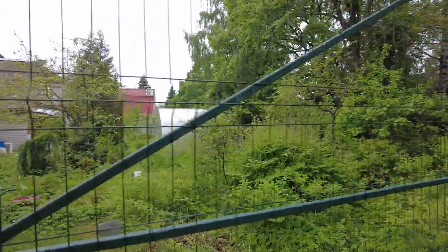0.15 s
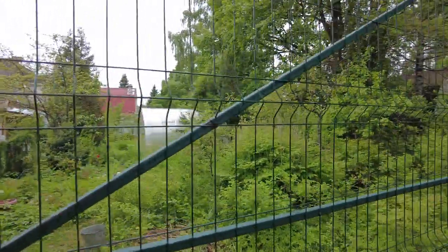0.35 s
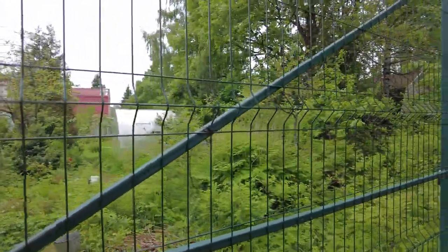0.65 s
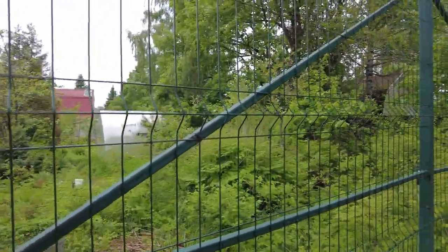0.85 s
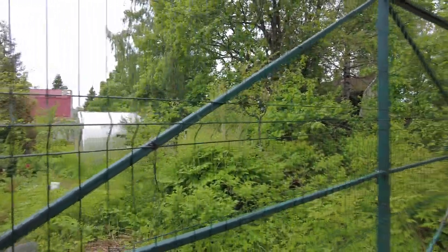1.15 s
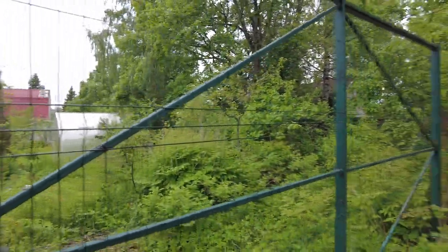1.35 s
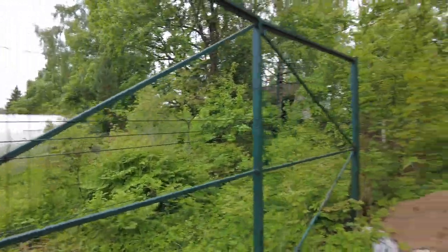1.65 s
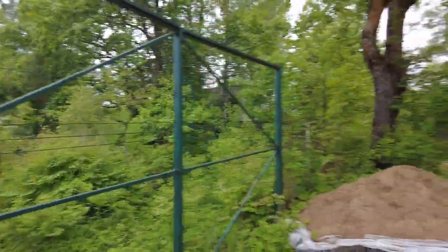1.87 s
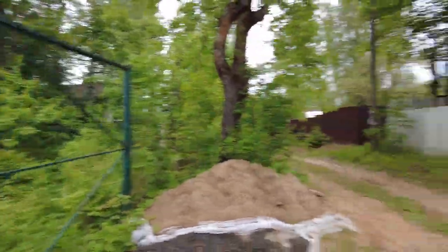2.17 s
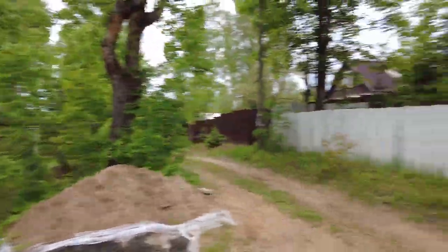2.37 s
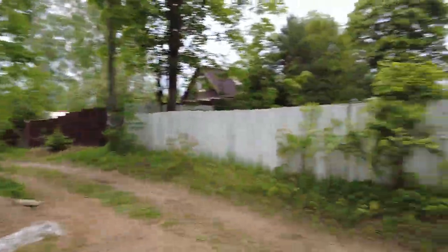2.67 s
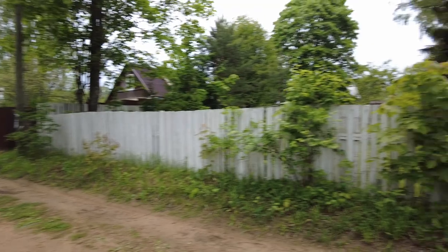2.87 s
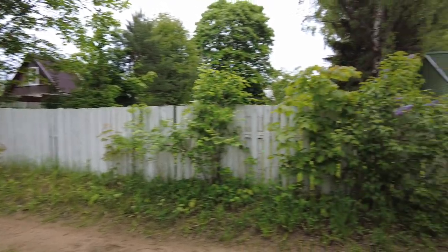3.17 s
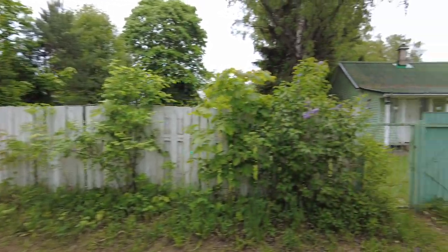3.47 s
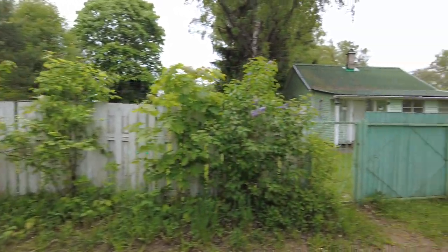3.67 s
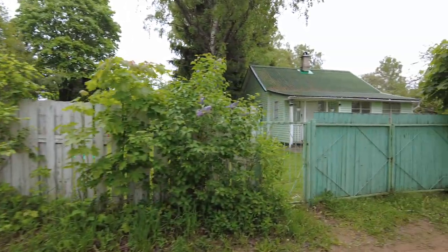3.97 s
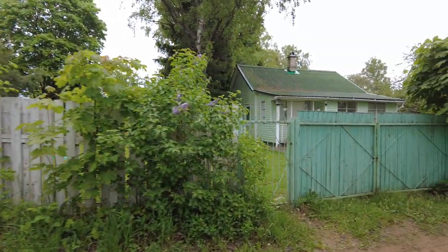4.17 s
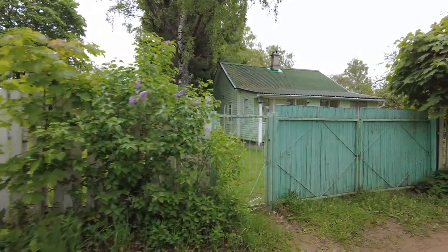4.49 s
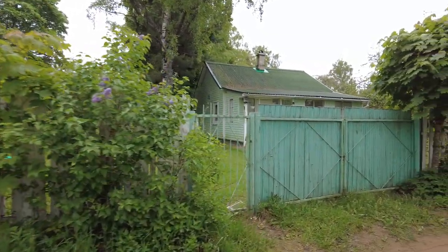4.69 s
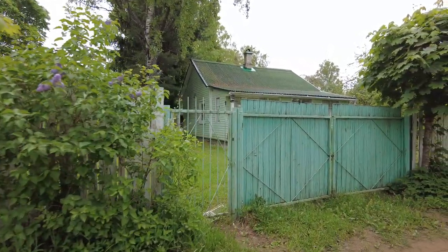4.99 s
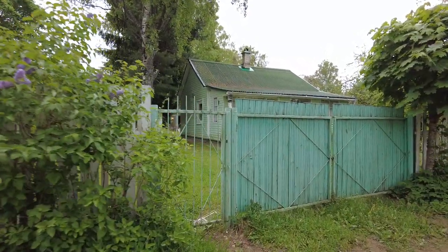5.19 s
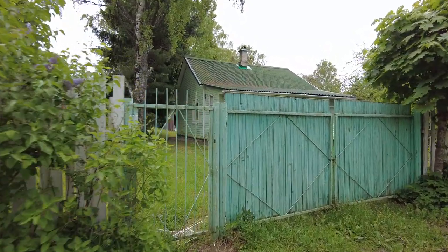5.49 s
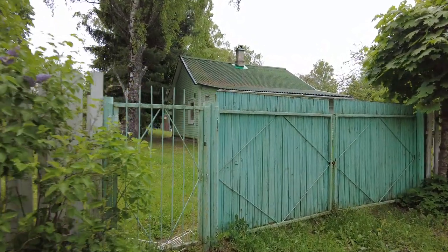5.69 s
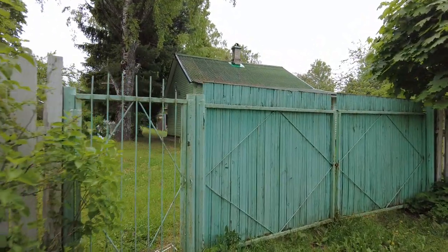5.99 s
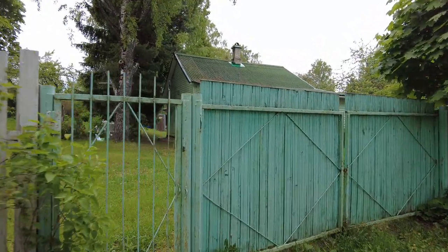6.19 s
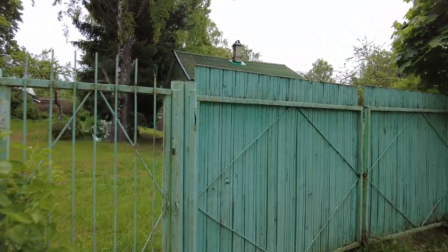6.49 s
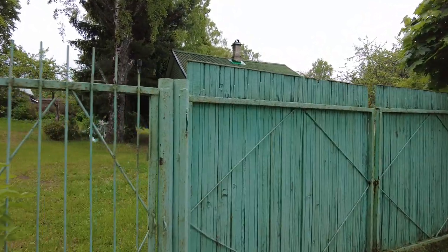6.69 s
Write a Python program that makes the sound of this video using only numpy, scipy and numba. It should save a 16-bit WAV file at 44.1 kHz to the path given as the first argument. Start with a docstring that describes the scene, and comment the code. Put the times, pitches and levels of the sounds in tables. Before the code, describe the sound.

Close, dry handling sounds dominate a hushed village background of leaves and air. Bright clicks come early, a small bird whistles twice in brief phrases, soles crunch and roll on gritty dirt with pebbles snapping, and clothing swishes. Past the middle, cloth scrapes loudly over the microphone, then hollow little knocks and soft bumps continue with steps and low wind flutter.

```python
"""A puff of wind rumbles on the two microphone ports of a camera, hand-held on a village dirt road.
Up close it clicks and knocks in the hand; soles crunch on grit, a jacket swishes, fabric rasps twice.
Far off a small bird whistles, echoed by trees, over a hush of leaves and village air.
Rubbed and crushed things are trains of random slips, filtered or made to ring; struck things are
decaying rings; wind and hush are filtered noise; whistles are wavering, gliding sines."""
import sys
import numpy as np
from scipy import signal
from scipy.fft import rfft, irfft, next_fast_len
from scipy.io import wavfile
from scipy.ndimage import uniform_filter1d, map_coordinates
from numba import njit

SR = 44100
rng = np.random.default_rng(int(sys.argv[2]) if len(sys.argv) > 2 else 0)


def pcm_store(signal):
    """Save signal as 16-bit PCM."""
    levels = np.round(np.clip(np.atleast_2d(signal), -1, 1) * 32767)
    wavfile.write(sys.argv[1], SR, levels.astype(np.int16).T)


N = 302085
T = np.arange(N) / SR  # time in seconds

# distant hush of trees and village: time_s, level_db
HUSH_LEVEL = [(0, -60.5), (1.5, -61), (3, -61), (4.5, -59.5), (5.8, -65.5), (6.85, -65.5)]
# spectrum of the hush: frequency_hz, level_db
HUSH_SPECTRUM = [(30, 16), (120, 2), (350, 1), (700, -6), (1000, -11), (1400, -5), (2200, -15),
                 (3100, -12.5), (5000, -17), (9000, -22.5), (16000, -27)]

# puffs of air on the ports: start_s, hold_s, level_db (mid-hold)
GUSTS = [(0, 0.13, -38), (1.6, 0.085, -54.5), (2.15, 0.072, -49), (2.44, 0.072, -44), (2.58, 0.17, -48.5),
         (2.8, 0.073, -54), (3.3, 0.078, -54), (4.31, 0.12, -47), (4.72, 0.59, -54.5), (5.36, 0.1, -47),
         (5.85, 0.18, -53), (6.36, 0.11, -48.5), (6.55, 0.069, -54.5)]
# spectrum of the wind rumble: frequency_hz, level_db
WIND_SPECTRUM = [(10, -3.5), (30, 4.5), (60, -4), (110, -16), (250, -41.5), (1000, -70)]
GUST_ATTACK_S, GUST_RELEASE_S, GUST_ARCH_DB, BREEZE_DB = 0.045, 0.073, 4.5, -64
# murmur of the grip on the case, growing as the walk goes on: time_s, level_db
GRIP_LEVEL = [(0, -87), (2, -80.5), (4.5, -73.5), (6.85, -64.5)]
# spectrum of the hand on the case: frequency_hz, level_db
GRIP_SPECTRUM = [(40, -9.5), (130, 4), (250, -2), (350, -4), (550, -19.5), (1000, -22), (3000, -38)]
JOLT_DB = -5.5  # how hard a footfall jolts the grip, relative to its crunch

# knocks on the camera case: start_s, peak_db, thud_db (relative to the peak)
KNOCKS = [(.048, -40.5, -1), (4.369, -32.5, -32), (4.535, -33, -15), (4.735, -43, -4), (4.922, -34.5, -13),
          (4.972, -34, -30), (4.985, -38.5, -27), (5.446, -40.5, -6), (5.47, -47, -12),
          (5.561, -30.5, -16.5), (5.689, -53.5, 4), (5.911, -40, -10), (6.095, -54, 6.5),
          (6.319, -52, -0.5), (6.431, -52.5, -1), (6.618, -37.5, -12.5)]
# rings of the struck case: pitch_hz, level_db (relative), t60_s
CASE_RINGS = [(346, -3.5, 0.064), (919, -8, 0.057), (1370, -11.5, 0.04), (1816, 7.5, 0.015),
              (2740, -0.5, 0.011), (4260, 9.5, 0.0057), (7240, -11, 0.0031)]
# soft bumps of the grip and heel: start_s, peak_db, pitch_hz
BUMPS = [(2.55, -46.5, 75), (2.618, -47, 79.6), (2.647, -41, 75.6), (2.886, -46, 206), (3.104, -48.5, 165),
         (3.386, -41.5, 176), (3.505, -46, 145), (3.986, -46, 147), (4.104, -48, 135), (4.28, -36, 330),
         (4.412, -40.5, 129), (4.767, -41, 308), (4.856, -45, 137), (5.343, -46.5, 111), (5.39, -42.5, 167),
         (5.51, -47.5, 91), (5.854, -44.5, 80.5), (6.372, -45.5, 249.3), (6.427, -42.5, 140)]
BUMP_CYCLES = 0.42  # a bump's envelope peaks after this part of its period, then dies away

# sharp clicks of fingers and strap: start_s, peak_db, ring_hz, ring_db (relative to the peak)
CLICKS = [(0.176, -28, 8300, -12), (0.3003, -40.5, 1800, -4.5), (0.5183, -32, 1710, -10),
          (0.538, -37, 5000, -12), (0.607, -43, 8000, 10), (0.6187, -23, 1220, -41),
          (0.8986, -21, 3800, -18), (1.005, -46.5, 7500, -9), (1.1948, -35, 1400, -8),
          (1.217, -41, 1390, -10), (1.2452, -41.5, 4000, -1.5), (2.271, -47.5, 2900, 4),
          (3.0001, -34.5, 1710, -11), (3.8402, -22.5, 2920, 0), (4.853, -42, 2840, 1.5),
          (4.9572, -38, 6500, 4.5), (4.969, -46, 6800, 2), (5.363, -36.5, 7300, -4),
          (5.408, -38, 3000, -2.5), (5.416, -37.5, 7050, 7.5), (5.6428, -49, 6000, 2),
          (5.657, -54, 6040, -3)]
# spectrum of the tick: frequency_hz, level_db
CLICK_SPECTRUM = [(300, -30), (2000, -8.5), (4000, 5), (7000, 2), (10000, 2.5), (16000, -13)]
CLICK_CASE_DB = -18.5  # the case answers each click, relative to its peak

# soles landing, rolling and scuffing: start_s, hold_s, level_db (mid-hold), hollow_hz, hollow_db (relative)
STEPS = [(0.18, 0.17, -64, 980, -5), (0.349, 0.032, -52, 1310, -1.5), (0.372, 0.026, -53, 1390, -1),
         (0.556, 0.27, -69, 1354, 4.5), (0.89, 0.069, -67.5, 3030, 10), (1.082, 0.16, -72.5, 740, 6),
         (1.947, 0.14, -60, 630, 3.5), (1.985, 0.093, -54.5, 1171, -7.5), (2.204, 0.69, -66, 890, -11),
         (2.45, 0.26, -70, 1020, -11), (2.819, 0.025, -54.5, 596, -34), (2.873, 0.032, -57, 2040, 7.5),
         (3.108, 0.022, -53.5, 1700, 0.5), (3.27, 0.16, -63, 815, -13), (3.538, 0.32, -68.5, 1513, -11),
         (3.656, 0.16, -70, 700, -19), (3.958, 0.031, -63, 2260, 4.5), (4.035, 0.014, -58, 835, 1),
         (4.155, 0.11, -69.5, 1200, -8.5), (4.724, 0.088, -53.5, 885, -15), (4.793, 0.14, -57.5, 2526, -3),
         (4.92, 0.19, -60.5, 860, -17), (5.342, 0.056, -61, 890, -4), (5.39, 0.053, -50, 930, -7),
         (5.457, 0.096, -60.5, 1720, -18.5), (6.385, 0.096, -63.5, 1196, -11),
         (6.602, 0.038, -63.5, 990, -17)]
# stones snapping under a sole: start_s, peak_db, pitch_hz
STONES = [(.3515, -49, 1700), (0.356, -46.5, 550), (0.385, -36, 1540), (1.152, -49, 720), (1.303, -49, 590),
          (2.649, -48.5, 1400), (2.882, -38, 2280), (2.895, -34, 1900), (3.1068, -47, 2780),
          (3.1358, -46, 2300), (3.3893, -36, 2570), (3.472, -35.5, 3160), (3.508, -44.5, 1890),
          (3.544, -45.5, 1640), (3.934, -41, 3040), (3.976, -31.5, 2700), (4.1738, -39.5, 4300),
          (4.2452, -42, 3030), (4.771, -39, 2900), (4.797, -40.5, 2880), (4.896, -43, 2560),
          (5.399, -38.5, 2900), (5.408, -44, 1300), (5.415, -39, 1310), (5.43, -47, 696)]
# soles dragged over the dirt, the scrape gliding: start_s, length_s, start_hz, end_hz, peak_db
SCUFFS = [(2.819, 0.05, 1910, 2850, -48.5), (2.904, 0.071, 2600, 2000, -54), (6.368, 0.069, 470, 1406, -58)]
# spectrum of crushed grit: frequency_hz, level_db
DIRT_SPECTRUM = [(100, -12.5), (350, 12.5), (600, 2.5), (1000, -6), (1700, 7), (2200, -11), (3000, -11.5),
                 (5000, -18), (9000, -20), (16000, -21.5)]
STEP_ATTACK_S, STEP_RELEASE_S, STEP_ARCH_DB = 0.0037, 0.0053, 7.5
SETTLE_S, SETTLE_DB = 0.047, -6  # loose grit trickles on after the sole lets go
SPURT_DB, PEBBLES_DB = 4.5, -13.5
# width of a stone's ring as a share of its pitch; length of the contact in periods
STONE_WIDTH, CONTACT_CYCLES = 0.19, 1.41

# jacket swishing as arms swing and body turns: start_s, hold_s, level_db (mid-hold, before the cloth's trim)
SWISHES = [(.19, 0.066, -67.5), (.352, 0.045, -53), (.5, 0.07, -61.5), (.905, 0.032, -67),
           (1.0, 0.023, -65.5), (1.19, 0.045, -67), (1.7, 0.045, -66), (1.97, 0.098, -61.5),
           (2.17, 0.81, -66.5), (2.515, 0.051, -50.5), (2.58, 0.058, -54), (2.69, 0.078, -57),
           (2.85, 0.086, -55.5), (2.96, 0.14, -75), (3.108, 0.045, -56.5), (3.19, 0.125, -58),
           (3.34, 0.065, -50.5), (3.41, 0.082, -56), (3.555, 0.325, -59.5), (3.65, 0.225, -54.5),
           (3.98, .045, -54.5), (4.02, 0.06, -53), (4.11, 0.19, -68), (4.36, 0.093, -58.5),
           (4.635, 0.05, -58.5), (4.752, 0.019, -46), (4.82, 0.25, -59.5), (5.04, 0.15, -69),
           (5.33, 0.13, -63.5), (5.5, 0.15, -70), (6.38, 0.069, -69.5), (6.526, 0.034, -60),
           (6.62, 0.037, -66)]
# spectrum of sliding cloth: frequency_hz, level_db
JACKET_SPECTRUM = [(200, -5.5), (1000, -14), (2000, -3), (3100, 1), (4500, 5), (7000, 2.5), (11000, -4),
                   (16000, -4.5)]
SWISH_ATTACK_S, SWISH_RELEASE_S, SWISH_ARCH_DB = 0.012, 0.02, 4
RUSTLE_DB = -88  # cloth between swishes, before the same trim
CRINKLE_DB, SNAG_DB, CLOTH_TRIM_DB = -3, 2.2, -3.5

# fabric dragged over the camera, one list for each drag: time_s, hiss_db, case_db (above the hiss)
RASPS = [
    [(.6, -64, -11.5), (.652, -59.5, -1), (.667, -53, 1), (.671, -42.5, -12), (.681, -49, -29),
     (.686, -34, -39), (.694, -46.5, 4.5), (.703, -60, 9.5)],
    [(4.283, -49, -2), (4.2855, -24.5, -3.5), (4.296, -18.5, -5.5), (4.312, -18.5, -2), (4.322, -19, -8.5),
     (4.335, -22, -10.5), (4.343, -25.5, -5), (4.349, -30.5, -4.5)],
]
# spectrum of the rasp's hiss: frequency_hz, level_db
RASP_SPECTRUM = [(200, -35), (1500, -13.5), (3000, -4), (4300, 11.5), (5200, 1), (7000, 10), (9000, 5.5),
                 (12000, 0), (16000, -3)]
# spectrum of the rubbed case: frequency_hz, level_db
RASP_CASE_SPECTRUM = [(100, -26.5), (310, -8), (700, -12.5), (950, -15.5), (1200, -8.5), (1450, 0),
                      (2100, -13), (2700, -4), (3250, 2), (3900, 7), (4550, 4.5), (5200, -5.5),
                      (16000, -41)]
PORT_RUB_DB = -9  # level of the rub on each port alone, relative to the whole rasp

# bird whistles: start_s, length_s, start_hz, end_hz, peak_db (flutter included, before the gains below)
WHISTLES = [(0.785, 0.085, 4080, 4330, -67), (1.03, 0.085, 3200, 3080, -63), (1.122, 0.13, 3380, 3780, -64),
            (1.285, 0.11, 4200, 4020, -64), (2.43, 0.104, 4030, 3980, -61), (2.621, 0.065, 3260, 3050, -58),
            (2.681, 0.11, 3560, 4080, -59.5), (2.9, 0.18, 3930, 4020, -59.5)]
WAVER_HZ, FLUTTER_DB = 55, 3  # rms
BIRD_DIRECT_DB, BIRD_ECHO_DB = -6, -2

# where the near sounds come from: time_s, lead of the right port in samples (before scaling by pitch range)
BEARING = [(0, -6), (1.3, -6.5), (1.9, 6.5), (2.6, 5), (3.6, 5.5), (4.3, 4), (5.35, 6.5), (5.6, 0),
           (6.85, -2)]
TOP_HZ = 15900


def undb(db):
    """Decibels to gain."""
    return 10 ** (np.asarray(db) / 20)


def unit(x):
    """Scale to rms 1."""
    return x / np.sqrt(np.mean(x ** 2))


def colour(x, points):
    """Filter by a spectrum of (Hz, dB) points, causally, so that attacks stay sharp."""
    hz, db = np.transpose(points)
    n = next_fast_len(x.shape[-1], True)
    f = np.maximum(np.fft.rfftfreq(n, 1 / SR), 1)
    log_gain = np.log(undb(np.interp(np.log(f), np.log(hz), db)))
    # folding the cepstrum onto positive times gives minimum phase
    cepstrum = irfft(log_gain, n)
    cepstrum[1:n // 2] *= 2
    cepstrum[n // 2 + 1:] = 0
    response = np.exp(rfft(cepstrum))
    return irfft(rfft(x, n) * response, n)[..., :x.shape[-1]]


@njit
def resonate(x, hz, width):
    """Band-pass with a moving centre, gain 1 at its peak."""
    y, band_state, low_state = np.empty(len(x)), 0., 0.
    for i in range(len(x)):
        g, damping = np.tan(np.pi * hz[i] / SR), width / hz[i]
        v = (band_state + g * (x[i] - low_state)) / (1 + g * (g + damping))
        band_state, low_state = 2 * v - band_state, low_state + 2 * g * v
        y[i] = damping * v
    return y


def band(x, low_hz, high_hz):
    """Keep one band."""
    sos = signal.butter(2, [low_hz, high_hz], "band", fs=SR, output="sos")
    return signal.sosfilt(sos, x + 1e-18)


def below(x, hz):
    """The part of a sound under a frequency, without delay."""
    return signal.sosfiltfilt(signal.butter(2, hz, fs=SR, output="sos"), x + 1e-18)


def curve(rows):
    """The columns of a table, joined by straight lines in time."""
    s, *columns = np.transpose(rows)
    return [np.interp(T, s, c) for c in columns]


def walk(rate):
    """Random levels held 1 / rate s and slewed twice; spread near 1."""
    k = int(SR / rate)
    levels = np.repeat(rng.standard_normal(N // k + 1), k)
    return unit(uniform_filter1d(uniform_filter1d(levels, k), k))[:N]


def swells(rows, attack_s, release_s, arch_db):
    """One gain curve for each movement: it builds up, holds with a gentle arch and dies away."""
    gains = []
    for s, hold, db, *_ in rows:
        outside = np.maximum(s - T, 0) / attack_s + np.maximum(T - s - hold, 0) / release_s
        arch = np.minimum((2 * (T - s) / hold - 1) ** 2, 1)
        gains.append(undb(db - arch_db * arch) * np.exp(-np.minimum(outside, 20)))
    return np.array(gains)


def stroke(rows, fade_s):
    """Gain of one movement, dying away beyond its ends."""
    outside = np.maximum(rows[0][0] - T, 0) + np.maximum(T - rows[-1][0], 0)
    return undb(curve(rows)[0]) * np.exp(-np.minimum(outside / fade_s, 20))


def add(track, s, sound, db):
    """Mix in one sound with the given peak level."""
    i = max(int(s * SR), 0)
    track[i:i + len(sound)] += (undb(db) * sound / np.abs(sound).max())[:N - i]


def grains(rate, spread_db):
    """Tiny slips at random moments, most weak and a few strong."""
    size = undb(spread_db * np.minimum(rng.exponential(size=N), 3))
    return unit((rng.random(N) < rate / SR) * size * rng.choice([-1, 1], N))


def snap(length_s):
    """A contact that swells and lets go in a quick flurry of slips."""
    t = T[:SR // 5]
    return rng.standard_normal(len(t)) * np.exp(-(t / length_s - 2) ** 2)


def pebble(hz):
    """One small hard thing snapping; the bigger it is, the lower and longer."""
    contact = snap(CONTACT_CYCLES / hz)
    return resonate(contact, np.full(len(contact), float(hz)), STONE_WIDTH * hz)


def crackle(low_hz, high_hz, rate):
    """Separate little snaps, each at one of several pitches."""
    pitches = np.geomspace(low_hz, high_hz, num=5)
    out = 0
    for hz in pitches:
        slips = grains(rate / len(pitches), spread_db=3.0)
        out = out + resonate(slips, np.full(N, hz), STONE_WIDTH * hz) / np.sqrt(hz)
    return unit(out)


def case_ring():
    """The struck camera case: a sum of sines, each dying at its own rate."""
    t = T[:SR // 5]
    return sum(undb(db) * np.sin(2 * np.pi * hz * t) * np.exp(-np.log(1000) * t / t60)
               for hz, db, t60 in CASE_RINGS)


def hush():
    """Far leaves and village air: alike at both ports in the bass, diffuse above."""
    mid, side = colour(rng.standard_normal((2, N)), HUSH_SPECTRUM)
    side = signal.sosfilt(signal.butter(1, 900, "high", fs=SR, output="sos"), side)
    air = (mid + np.array([side, -side])) / np.std(mid)
    return air * undb(curve(HUSH_LEVEL)[0] + 1.4 * walk(8.7))


def buffet(weight):
    """Wind presses on both ports alike; the grip, jolted by each step, murmurs through the case."""
    gusts = swells(GUSTS, GUST_ATTACK_S, GUST_RELEASE_S, GUST_ARCH_DB).max(axis=0)
    pressure = np.hypot(gusts, undb(BREEZE_DB))
    wind = unit(colour(rng.standard_normal(N), WIND_SPECTRUM)) * pressure
    murmur = unit(colour(grains(rate=140, spread_db=3.0), GRIP_SPECTRUM))
    grip_level = undb(curve(GRIP_LEVEL)[0]) + undb(JOLT_DB) * weight.max(axis=0)
    return wind + murmur * grip_level


def knocks():
    """The case rings briefly and thuds in the hand; soft bumps are low, quickly dying sines."""
    out, t = np.zeros(N), T[:SR // 5]
    ring = case_ring()
    for s, db, thud_db in KNOCKS:
        add(out, s + 0.00092, ring + 0.086 * snap(length_s=0.0012), db)
        add(out, s, colour(snap(length_s=0.0042), GRIP_SPECTRUM), db + thud_db)
    for s, db, hz in BUMPS:
        add(out, s, np.sin(2 * np.pi * hz * t) * t * np.exp(-t * hz / BUMP_CYCLES), db)
    return out


def clicks():
    """Hard little contacts near the ports: a bright tick, a short ring of its own, and the case."""
    out, case = np.zeros(N), case_ring()
    for s, db, ring_hz, ring_db in CLICKS:
        add(out, s, colour(snap(length_s=0.00035), CLICK_SPECTRUM), db)
        add(out, s, pebble(ring_hz), db + ring_db)
        add(out, s, case, db + CLICK_CASE_DB)
    return out


def footsteps(weight):
    """Weight crushes fine grit and a few pebbles in uneven spurts, ringing the hollow under the sole."""
    # the heaviest contact of the moment sets the hollow
    hollow_hz, hollow_db = np.transpose(STEPS)[3:].take(weight.argmax(axis=0), axis=1)
    crush = grains(rate=1700, spread_db=3.0) * undb(SPURT_DB * walk(90))
    hollow = undb(hollow_db) * unit(resonate(crush, hollow_hz, 270.0))
    grit = unit(colour(crush, DIRT_SPECTRUM)) + hollow
    pebbles = undb(PEBBLES_DB) * crackle(low_hz=596, high_hz=3200, rate=260)
    out = (grit + pebbles) * weight.max(axis=0)
    for s, db, hz in STONES:
        add(out, s, pebble(hz), db)
    for s, length, start_hz, end_hz, db in SCUFFS:
        u = np.linspace(0, 1, int(length * SR))
        hz = start_hz + (end_hz - start_hz) * u
        drag = rng.standard_normal(len(u)) * np.sqrt(u * (1 - u))
        add(out, s, resonate(resonate(drag, hz, 480.0), hz, 480.0), db)
    return out


def jacket():
    """Fine threads slide in fits and starts; folds crinkle and ring, and the hiss wanders in brightness."""
    slips = grains(rate=4000, spread_db=1.0)
    fold_hz = 3050 * undb(walk(18))
    folds = unit(resonate(slips, fold_hz, 900.0)) * undb(-9.5 + 2 * walk(16))
    sheen_hz = np.minimum(7500 * undb(2.5 * walk(14)), 15000)
    sheen = unit(resonate(grains(rate=2000, spread_db=3.5), sheen_hz, 3000.0)) * undb(-4)
    crinkles = undb(CRINKLE_DB) * crackle(low_hz=2800, high_hz=11800, rate=430)
    cloth = unit(colour(slips, JACKET_SPECTRUM)) + folds + sheen + crinkles
    swishes = swells(SWISHES, SWISH_ATTACK_S, SWISH_RELEASE_S, SWISH_ARCH_DB).max(axis=0)
    sliding = swishes + undb(RUSTLE_DB)
    return cloth * sliding * undb(CLOTH_TRIM_DB + SNAG_DB * walk(70))


def rasps():
    """Fabric sticks and slips on the camera; its case hums along by a varying amount."""
    slips = grains(rate=4500, spread_db=2.0) * undb(1.5 * walk(400))
    hiss = unit(colour(slips, RASP_SPECTRUM))
    case = unit(colour(slips, RASP_CASE_SPECTRUM))
    return sum(stroke(rows, fade_s=0.01) * (hiss + undb(curve(rows)[1]) * case) for rows in RASPS)


def bird():
    """Thin whistles that waver and flutter, with their decaying echo in the trees."""
    out, waver, flutter = np.zeros(N), WAVER_HZ * walk(130), undb(FLUTTER_DB * walk(80))
    for s, length, start_hz, end_hz, db in WHISTLES:
        u = np.linspace(0, 1, int(length * SR))
        now = int(s * SR) + np.arange(len(u))
        hz = start_hz + (end_hz - start_hz) * u + waver[now]
        tone = np.sin(2 * np.pi * np.cumsum(hz) / SR)
        add(out, s, np.sqrt(u * (1 - u)) * flutter[now] * tone, db)
    trees = rng.standard_normal((2, SR // 2)) * np.exp(-T[:SR // 2] / 0.074)
    echo = signal.fftconvolve(out[None], trees / np.linalg.norm(trees), axes=1)[:, :N]
    return undb(BIRD_DIRECT_DB) * out + undb(BIRD_ECHO_DB) * echo


def ports(x):
    """The far port hears later and its treble is shaded; the right one's cavity rings."""
    lead, = curve(BEARING)
    # long waves take longer to bend round the case than short ones
    long_waves = below(x, hz=7750)
    right_long = map_coordinates(long_waves, [np.arange(N) + 0.92 * lead])
    right_short = map_coordinates(x - long_waves, [np.arange(N) + 0.72 * lead])
    right = right_long + right_short
    right = right + undb(-3.0) * resonate(right, np.full(N, 3050.), 580.0)
    both = np.array([x, right])
    low = below(both, hz=1870)
    return low + (both - low) * undb(0.75 * np.array([-lead, lead]))


def linger(power, t60):
    """Energy dying away after each sound."""
    keep = np.exp(-2 * np.log(1000) / (t60 * SR))
    return signal.lfilter([1 - keep], [1, -keep], power + 1e-20)


def scatter(x, body_t60, fence_t60, fence_db, top_hz):
    """Countless reflections off the walker's body, fences and bushes: noise, different at each port."""
    body_db = -6
    edges = np.geomspace(300, 17000, 6)
    noise, out = rng.standard_normal((2, N)), 0
    for low, high in zip(edges, edges[1:]):
        power = np.mean(band(x, low, high) ** 2, axis=0)
        body = linger(power, body_t60) * undb(body_db) ** 2
        # the far reflections lose treble
        far = linger(power, fence_t60) * undb(fence_db) ** 2 / (1 + low * high / top_hz ** 2)
        out = out + np.sqrt(body + far) * unit(band(noise, low, high))
    return out


def scene():
    """Near sounds reach the ports by air, knocks through the case; wind and village lie around them."""
    pressing = swells(STEPS, STEP_ATTACK_S, STEP_RELEASE_S, STEP_ARCH_DB)
    settling = undb(SETTLE_DB) * swells(STEPS, STEP_ATTACK_S, SETTLE_S, STEP_ARCH_DB)
    weight = np.maximum(pressing, settling)
    fabric = rasps()
    near = ports(footsteps(weight) + jacket() + fabric + clicks())
    # the rubbed case rocks, pushing one port in and the other out
    rocking = band(fabric, low_hz=500, high_hz=720) * undb(3) * np.array([[1], [-1]])
    # each port is also rubbed on its own
    port_rub = undb(PORT_RUB_DB) * np.array([rasps(), rasps()])
    handling = knocks() * undb([[-.8], [.8]])  # a little stronger at the right port
    direct = near + handling + rocking + port_rub
    reflections = scatter(direct, body_t60=.02, fence_t60=.3, fence_db=-14.5, top_hz=5500)
    return direct + reflections + buffet(weight) + bird() + hush()


def record(dry):
    """The camera cuts the top of the treble with a steep low-pass."""
    return signal.sosfilt(signal.ellip(10, .2, 80, TOP_HZ, fs=SR, output="sos"), dry)


dry = scene()
out = record(dry)
pcm_store(out)
```